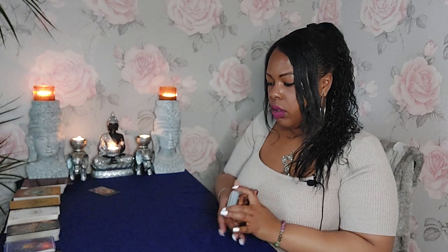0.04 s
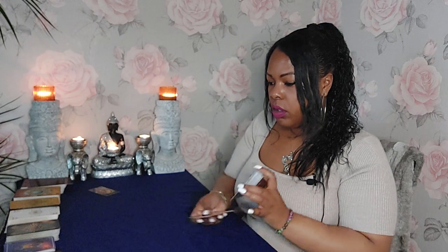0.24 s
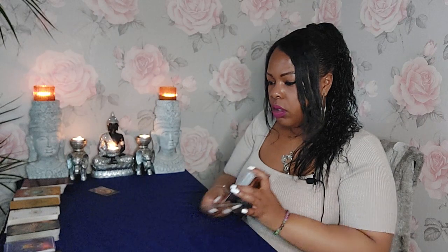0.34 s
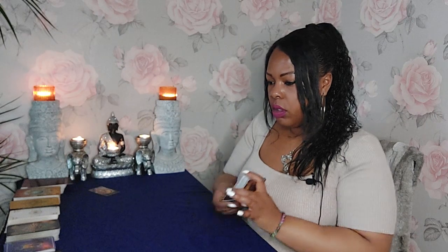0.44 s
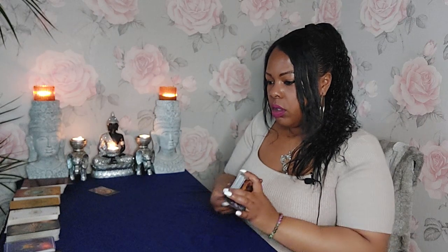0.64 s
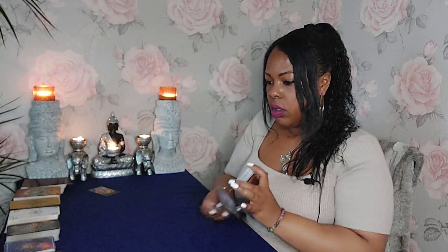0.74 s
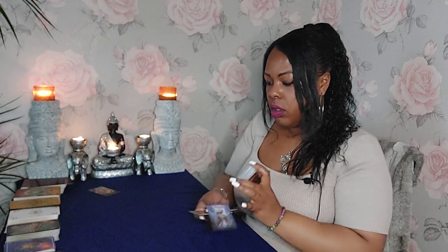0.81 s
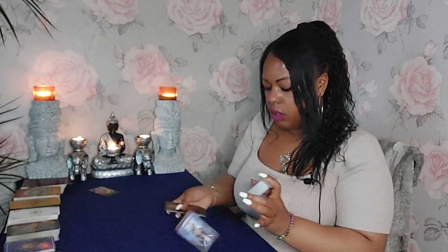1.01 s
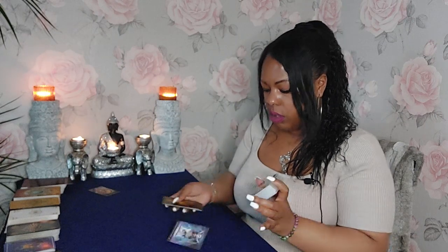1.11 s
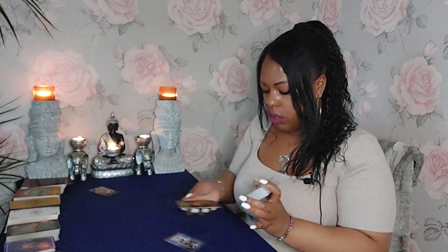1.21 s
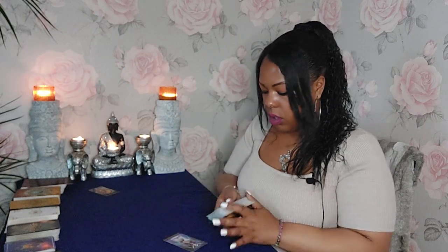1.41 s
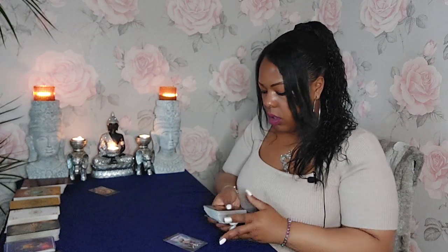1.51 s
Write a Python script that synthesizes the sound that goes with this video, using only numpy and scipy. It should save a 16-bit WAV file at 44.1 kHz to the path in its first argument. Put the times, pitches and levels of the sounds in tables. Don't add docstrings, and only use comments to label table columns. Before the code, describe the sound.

Card handling in a small furnished room: brief papery hisses and dry snaps, the loudest crack near the middle, then smaller taps and a final snap, with low bumps and faint sleeve rustle at a close body-worn microphone.

```python
import sys
import numpy as np
from scipy import signal
from scipy.fft import rfft, irfft
from scipy.io import wavfile
from scipy.ndimage import uniform_filter1d

SR = 44100
rng = np.random.default_rng(int(sys.argv[2]) if len(sys.argv) > 2 else 0)


def invert_db(level):
    return 10 ** (np.asarray(level, dtype=float) / 20)


def wrap_up_sound(samples):
    columns = np.atleast_2d(samples).T
    tamed = np.clip(columns, -1, 1)
    steps = np.round(tamed * 32767).astype(np.int16)
    wavfile.write(sys.argv[1], SR, steps)


N = 68355

# pitch_hz, level_db
AIR_SPECTRUM = [(20, -25), (50, -1), (120, 4.5), (300, -20), (1000, -22.5), (3000, -31.5), (9000, -29),
                (16000, -49.5)]
# start_s, level_db
HAND_MOTION = [(0, -63), (0.071, -81), (0.141, -62.5), (.22, -55), (.33, -55), (0.388, -100), (0.406, -62),
               (0.598, -55.5), (.68, -86), (.85, -63.5), (0.949, -73), (1.05, -77.5), (1.27, -78),
               (1.369, -61), (1.401, -59), (1.459, -58), (1.55, -73)]
# pitch_hz, level_db
CLOTH_SPECTRUM = [(200, -38.5), (500, -7), (1200, -7), (3000, -10.5), (6000, -15), (10000, -20),
                  (16000, -29.5)]
# start_s, step_db, rise_s, direction (+1 or -1)
PRESSURE_STEPS = [(.2174, -17.5, .0045, -1), (.2183, -23, .001, -1), (1.0008, -22.5, .005, -1),
                  (1.0385, -30.5, .012, 1), (.4935, -21.5, .0093, -1), (.503, -11.5, .006, -1),
                  (.503, -11, .02, 1), (1.2628, -19, .0066, -1), (1.3232, -24, .001, 1),
                  (1.324, -26, .002, -1), (1.3507, -29, .0022, 1), (1.395, -24.5, .006, 1),
                  (1.4585, -15.5, .0167, 1), (.003, -32, .008, -1), (.153, -36, .005, 1),
                  (.26, -28, .008, 1), (.2875, -30, .003, 1), (.299, -28, .006, -1), (.418, -28, .008, -1),
                  (.433, -24, .003, 1), (.454, -23, .01, 1), (.478, -24, .003, -1), (.683, -28, .004, -1),
                  (.6942, -26, .002, -1), (.7045, -24, .003, 1), (.7605, -18, .004, 1),
                  (1.08, -33, .008, -1), (1.107, -32, .01, -1), (1.2965, -26, .008, -1),
                  (1.319, -24, .006, 1), (1.347, -26, .006, 1), (1.4205, -28, .003, 1),
                  (1.4255, -27, .003, 1)]
# pitch_hz, t60_s
ROOM_DECAY = [(250, 0.69), (700, 0.56), (1800, .28), (5000, 0.33), (14000, 0.34)]
# pitch_hz, level_db, t60_s
TABLE_MODES = [(230, 0.5, 0.074), (337.8, -11, 0.2), (525.5, -1, 0.13), (626, -15, 0.13),
               (1014, -12.5, 0.16)]
# pitch_hz, level_db
SCRAPE_SPECTRUM = [(100, -25), (250, -3.5), (700, -7.5), (1500, -9.5), (3500, -12), (6000, -13.5),
                   (10000, -18), (16000, -34.5)]
# start_s, length_s, level_db, pitch_hz, peak_place (0-1)
SCRAPES = [(0.281, 0.031, -58, 2000, 0.12), (.437, 0.032, -38.5, 1890, 0.22),
           (0.472, .013, -28.5, 2080, 0.4), (.565, 0.029, -39, 350, 0.11), (1.421, 0.048, -39, 600, 0.074),
           (.7025, 0.0097, -9.5, 3230, .6), (0.7063, 0.005, -12.5, 1600, 0.77),
           (0.7103, 0.05, -30.5, 1703, .08), (.889, 0.036, -46.5, 900, 0.27),
           (1.432, 0.017, -37, 2850, 0.79), (1.529, 0.025, -51, 2570, 0.62)]
# pitch_hz, level_db
PAPER_SPECTRUM = [(200, -31), (600, -12.5), (2000, -10.5), (5000, -8.5), (10000, -9), (14000, -11.5),
                  (16500, -19.5)]
# start_s, length_s, level_db, pitch_hz, peak_place (0-1)
SLIDES = [(0.028, 0.035, -67.5, 9500, .5), (0.398, 0.015, -59, 5000, 0.05), (0.193, .06, -57, 6000, 0.67),
          (0.247, 0.031, -37, 8200, 0.42), (0.27, .018, -37, 11000, 0.3), (0.431, 0.03, -33, 8000, 0.63),
          (0.467, 0.022, -36.5, 8000, 0.47), (0.494, .05, -33.5, 7300, 0.8), (0.523, 0.042, -34.5, 9500, 1),
          (1.421, 0.035, -50, 4930, 0.3), (0.751, 0.027, -51, 9000, .25)]
# start_s, peak_db, pitch_hz, rise_s, damping_s
AIR_POCKETS = [(.7036, -8, 2750, .0028, .003), (.7072, -2, 1800, .0028, .0022),
               (.7045, -15, 3480, .002, .005), (.706, -16, 4530, .002, .004),
               (.6995, -15, 5800, .001, .003), (.7125, -19, 3300, .0006, .005),
               (.714, -29, 885, .004, .014), (.7245, -27, 1900, .004, .007), (.733, -26, 1800, .003, .006),
               (.727, -34, 3530, .003, .007), (.7622, -28, 4600, .001, .004),
               (.7075, -14, 1500, .002, .003), (.8812, -29, 1620, .0015, .006),
               (.881, -35, 3600, .001, .003), (.8905, -39, 860, .002, .005), (.891, -41, 1550, .002, .004),
               (.8707, -44, 5200, .0008, .003), (.9038, -33, 3550, .001, .0045),
               (.9036, -37, 850, .001, .003), (.91, -41, 900, .003, .012), (.926, -49, 3550, .002, .004),
               (1.4225, -25, 1270, .002, .005), (1.4222, -27, 6500, .0006, .003),
               (1.313, -53, 560, .002, .006), (.4755, -24, 2050, .002, .008),
               (.476, -27, 3700, .0015, .004), (1.443, -37, 3800, .003, .005),
               (1.447, -38, 3200, .003, .006), (.4349, -13, 1680, .0006, .004),
               (.4349, -11, 2900, .0005, .003), (.4349, -16, 4100, .0004, .003),
               (.478, -33, 380, .003, .008), (.597, -37, 390, .002, .005), (.5355, -24, 1650, .001, .005),
               (.505, -33, 2030, .002, .004), (.255, -44, 8100, .006, .01)]
# start_s, peak_db, pitch_hz, t60_s,
# edge_db
SMALL_SNAPS = [(0.1424, -33, 10600, 0.0045, -29), (.151, -33.5, 8600, 0.016, -15),
               (.2185, -38, 650, .003, -35), (1.3235, -46, 650, .003, -60), (1.134, -52.5, 790, 0.03, -30),
               (0.2292, -34, 3150, 0.022, -20), (0.5064, -52.5, 1967, 0.012, -10),
               (0.5721, -28.5, 1190, 0.013, -3), (.578, -34.5, 882, .02, -28.5),
               (.599, -40, 648.8, 0.009, -24), (.607, -43, 3570, 0.011, -7.5),
               (0.6465, -47.5, 4240, 0.13, -8), (0.6832, -24, 1500, 0.013, -7),
               (.843, -38, 1900, .012, -8), (.8707, -30.5, 1740, 0.011, -8),
               (.889, -30.5, 2500, 0.026, -3), (.9039, -31, 3450, .015, -4), (.996, -57, 4000, .01, 1),
               (1.021, -54.5, 7070, 0.0052, 7), (1.4105, -41.5, 3940, 0.037, -1.5),
               (1.499, -40.5, 2020, 0.047, -5)]
# start_s, peak_db, pitch_hz, t60_s, edge_db
EDGE_SNAPS = [(0.2887, -16, 1204, 0.0097, -15), (0.297, -25.5, 1276, 0.026, -9),
              (0.4352, -1.5, 3060, 0.004, 3.5), (0.4349, -19.5, 1704, 0.012, -4),
              (.472, -20, 2105, 0.019, -11), (0.5352, -17.5, 1900, .016, -9.5),
              (0.6942, -2, 3186, 0.006, -8), (0.6993, 1.5, 2700, 0.022, -3),
              (0.7628, -11, 1763, 0.022, -7.5), (0.8809, -19.5, 1776, .01, 2.5),
              (1.4223, -15, 1270, .016, -2), (1.4252, -9, 3100, .0025, -11), (1.4362, -27, 900, 0.028, -18)]


def evened(x):
    return x / np.sqrt(np.mean(x ** 2) + 1e-20)


def read_curve(points, hz):
    f, value = np.transpose(points)
    return np.interp(np.log(hz + 1), np.log(f + 1), value)


def add(mix, start_s, sound):
    part = mix[round(start_s * SR):][:len(sound)]
    part += sound[:len(part)]


def colour(noise, spectrum):
    gain = invert_db(read_curve(spectrum, np.fft.rfftfreq(len(noise), 1 / SR)))
    return evened(irfft(rfft(noise) * gain, len(noise)))


def resonate(x, hz, width_hz):
    r = np.exp(-np.pi * width_hz / SR)
    angle = 2 * np.pi * min(hz, SR / 2.5) / SR
    return signal.lfilter([1 - r, 0, r - 1], [1, -2 * r * np.cos(angle), r * r], x)


def gritty(count, grit_db):
    flicker = evened(uniform_filter1d(rng.standard_normal(count), 30))
    return rng.standard_normal(count) * invert_db(grit_db * flicker)


def room_tone():
    return invert_db(-67) * colour(rng.standard_normal(N), AIR_SPECTRUM)


def rustle():
    level = invert_db(np.interp(np.arange(N) / SR, *np.transpose(HAND_MOTION)))
    rumble_hz, rumble_db = 77.4, 11.5
    low = rng.standard_normal(N)
    for _ in range(2):
        low = resonate(low, rumble_hz / 2, rumble_hz)
    hiss = level * colour(gritty(N, grit_db=0.0), CLOTH_SPECTRUM)
    return hiss + invert_db(rumble_db - 32) * np.sqrt(level) * evened(low)


def thumps():
    slope = np.zeros(N)
    for start_s, step_db, rise_s, direction in PRESSURE_STEPS:
        bump = np.sin(np.pi * np.arange(0, rise_s, 1 / SR) / rise_s) ** 2
        add(slope, start_s, direction * invert_db(step_db) * bump / bump.sum())
    return np.cumsum(slope)


def room(x):
    gap = 20
    taps, at = np.zeros(SR // 2), np.arange(120, SR // 2 - gap, gap)
    taps[at + rng.integers(0, gap, len(at))] = rng.choice([-1., 1.], len(at))
    hz, t, bands = signal.stft(taps, SR, nperseg=256)
    decay = invert_db(-60 * t / read_curve(ROOM_DECAY, hz)[:, None])
    tail = signal.istft(bands * decay, SR, nperseg=256)[1]
    return signal.fftconvolve(x, tail / np.linalg.norm(tail))[:N]


def table_knock():
    t = np.arange(8000) / SR
    knock = np.zeros(len(t))
    for hz, db, t60 in TABLE_MODES:
        knock += invert_db(db - 60 * t / t60) * np.sin(2 * np.pi * hz * t)
    return invert_db(-48) * knock


def rub(length_s, level_db, hz, peak_place, width, spectrum, wash_db, grit_db):
    noise = gritty(4410, grit_db)
    body = evened(resonate(noise, hz, width * hz))
    x = evened(body + invert_db(wash_db) * colour(noise, spectrum))
    u = np.arange(0, length_s, 1 / SR) / length_s
    peak = np.clip(peak_place, .05, .95)
    swell = np.sin(np.pi / 2 * np.minimum(u / peak, (1 - u) / (1 - peak)))
    return invert_db(level_db) * x[:len(u)] * swell


def scrape(*row):
    return rub(*row, width=0.45, spectrum=SCRAPE_SPECTRUM, wash_db=0.5, grit_db=2.0)


def slide(*row):
    return rub(*row, width=0.19, spectrum=PAPER_SPECTRUM, wash_db=-2, grit_db=-1.5)


def air_pocket(peak_db, hz, rise_s, damping_s):
    sag, wobble = .03, .03
    t = np.arange(0, rise_s + damping_s, 1 / SR)
    shake = wobble * evened(uniform_filter1d(rng.standard_normal(3000), 60))[:len(t)]
    fall = sag * (1 - 2 * np.minimum(t / (2 * rise_s), 1))
    turns = np.cumsum(hz * (1 + shake + fall)) / SR
    rising = np.sin(np.pi / 2 * t / rise_s)
    dying = np.cos(np.pi / 2 * (t - rise_s) / damping_s) ** 2
    return invert_db(peak_db) * np.where(t < rise_s, rising, dying) * np.sin(2 * np.pi * turns)


def snap(peak_db, hz, t60_s, edge_db):
    top_hz = 11000
    width = 0.45 * hz
    t = np.arange(4000) / SR
    drive = rng.standard_normal(len(t)) * invert_db(-60 * t / t60_s)
    drive[1] -= 6.0
    drive = signal.lfilter(*signal.butter(2, top_hz, fs=SR), drive)
    bending = evened(resonate(drive, hz, width))
    bending = bending + invert_db(-10.5) * evened(resonate(drive, 1.9 * hz, width))
    bending = evened(signal.lfilter(*signal.butter(3, min(3.2 * hz, top_hz), fs=SR), bending))
    crack = evened(resonate(drive * invert_db(-30 * t / t60_s), 5500, 4200))
    push = evened(resonate(resonate(drive, 0.24 * hz, .5 * hz), 0.11 * hz, .5 * hz))
    x = bending + invert_db(edge_db) * crack + invert_db(-10.5) * push
    return invert_db(peak_db) * x / abs(x).max()


def cards():
    mix = np.zeros(N)
    add(mix, 1.134, table_knock())
    for source, events in [(scrape, SCRAPES), (slide, SLIDES), (air_pocket, AIR_POCKETS),
                           (snap, SMALL_SNAPS), (snap, EDGE_SNAPS)]:
        for start_s, *row in events:
            add(mix, start_s, source(*row))
    return mix


def scene():
    direct = cards()
    return (room_tone() + rustle() + thumps() + invert_db(-16) * room(direct) + direct)[None]


def band_limit(x):
    return signal.sosfilt(signal.butter(12, 16870, fs=SR, output="sos"), x)


def record(dry):
    corner, q = 2 * np.pi * 68, 1.45
    b, a = signal.bilinear([1, 0, 0], [1, corner / q, corner ** 2], SR)
    x = signal.lfilter(b, a, dry)
    x = signal.sosfilt(signal.butter(4, 25, "high", fs=SR, output="sos"), x)
    x = np.tanh(x)
    x = signal.oaconvolve(x, signal.firwin(255, 16100, fs=SR)[None], "same")
    return band_limit(x)


dry = scene()
out = record(dry)
wrap_up_sound(out)
```